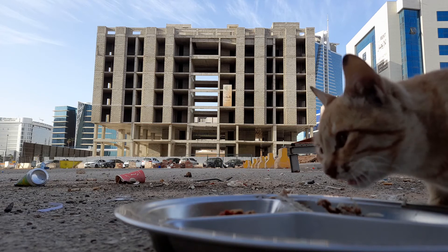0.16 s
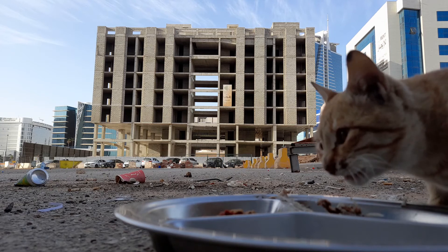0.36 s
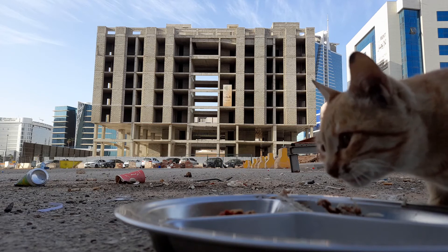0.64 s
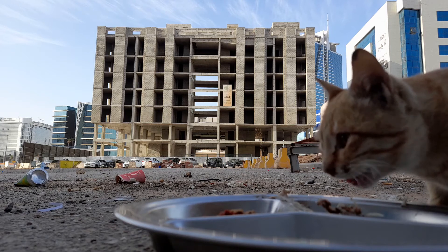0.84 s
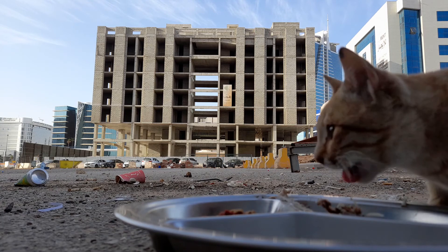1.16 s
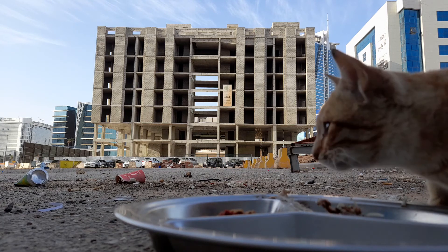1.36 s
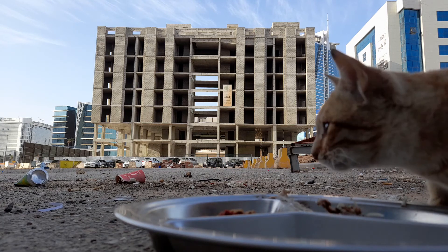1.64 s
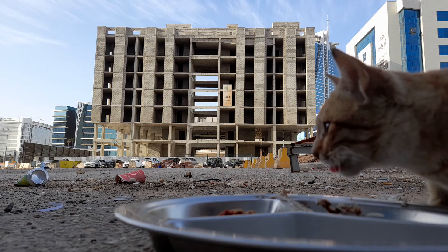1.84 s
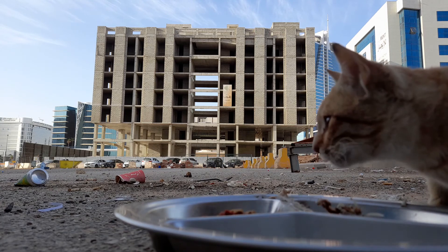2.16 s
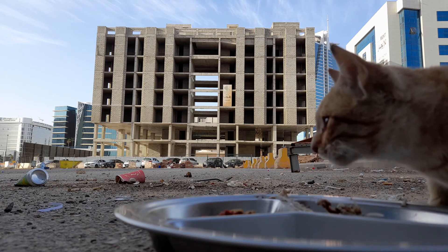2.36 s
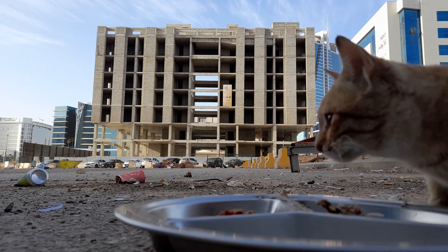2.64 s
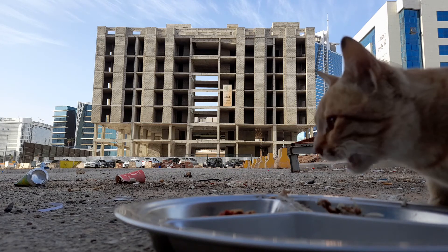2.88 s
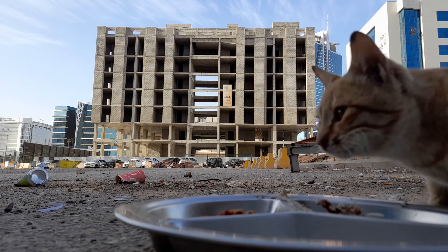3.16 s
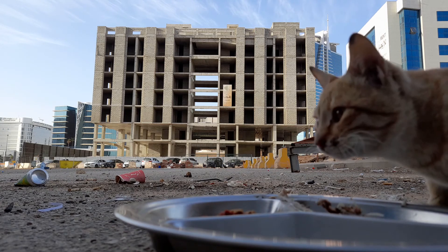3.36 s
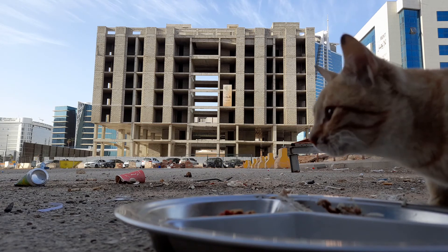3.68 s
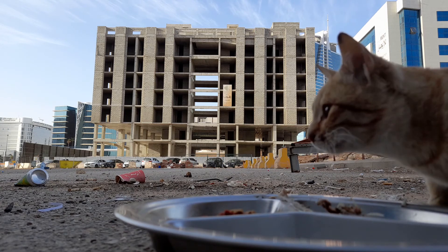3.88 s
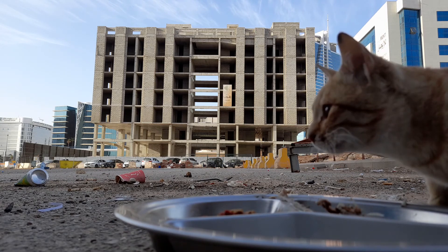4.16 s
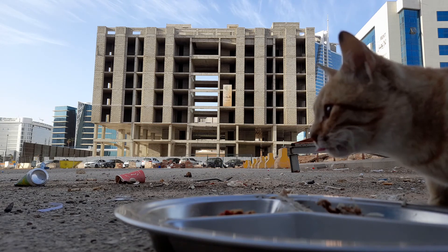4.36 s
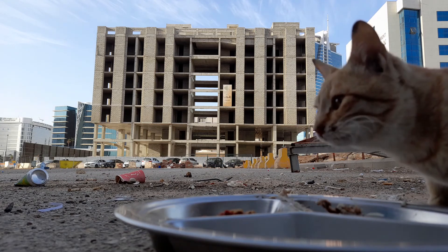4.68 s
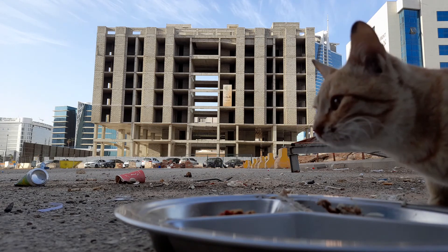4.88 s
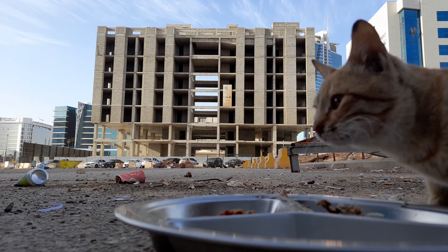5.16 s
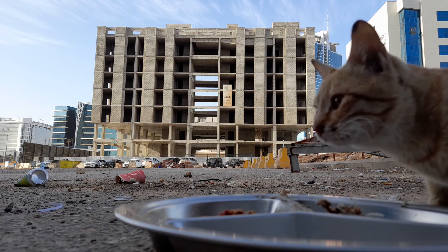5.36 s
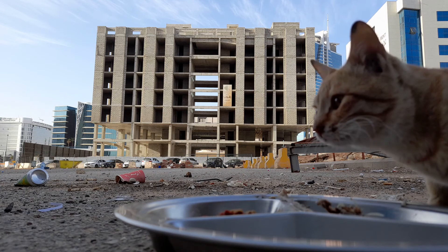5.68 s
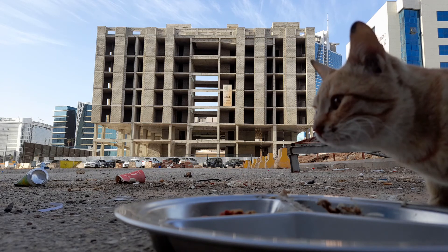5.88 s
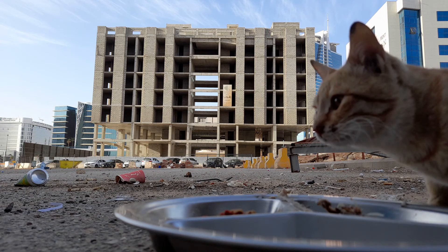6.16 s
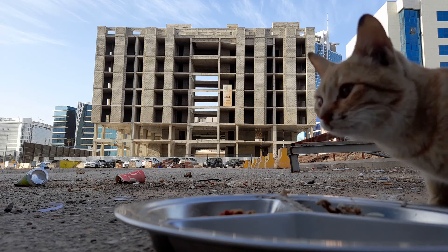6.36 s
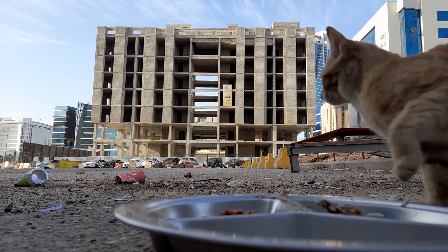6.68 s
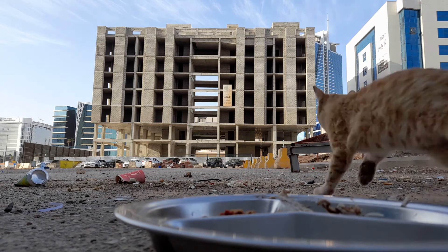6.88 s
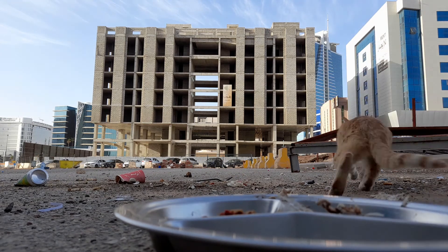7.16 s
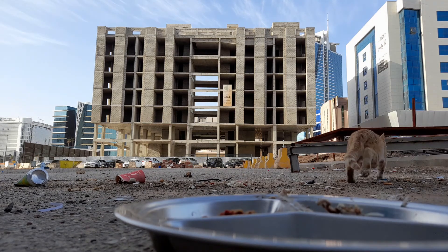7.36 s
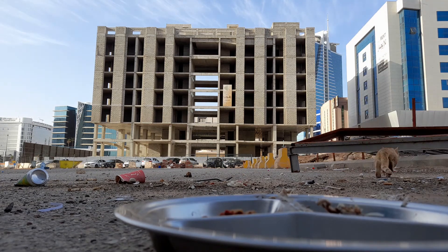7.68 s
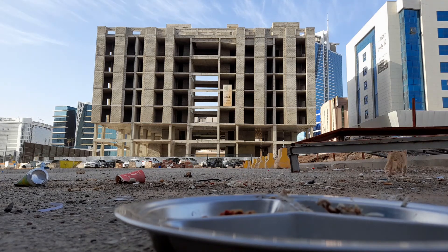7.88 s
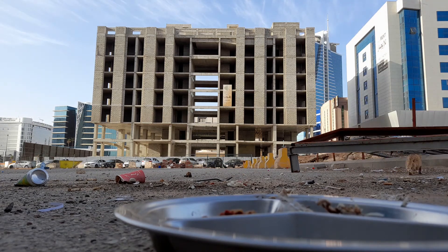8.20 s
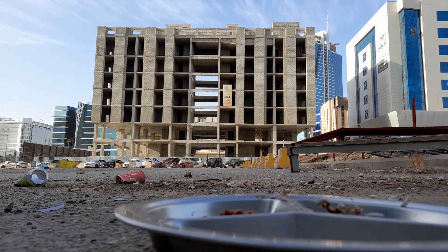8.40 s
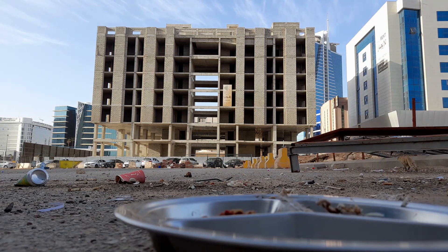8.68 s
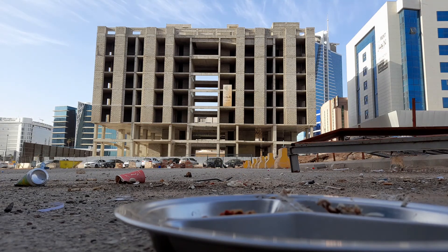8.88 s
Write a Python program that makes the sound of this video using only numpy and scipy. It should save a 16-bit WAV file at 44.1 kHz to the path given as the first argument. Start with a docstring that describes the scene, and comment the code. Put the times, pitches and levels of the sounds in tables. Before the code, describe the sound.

An open gravel lot in a city, heard in stereo close to the ground. Throughout the nine seconds, far traffic dominates: deep rumble around 100 Hz, a hollow boom near 300 Hz and a dull tyre roar with little treble, swelling and dipping slightly. A smeared low vehicle drone and its fainter higher partner climb gradually. A very thin whine above 4 kHz and soft microphone hiss lie underneath. Tiny crisp cat licks click nearby at 0.05-0.25 s, sparsely around 1.8-2.5 s, in a cluster near 2.9 s, and once at 4.6 s. From about 6 s small stones tick as the cat shifts; around 7-7.8 s quick gritty paw steps, leaning right, trot away and fade. Meanwhile a breeze bumps the left side at 6-7.5 s and 8.5 s, with left bass cutting in and out, strongest near 8 s. A faint husky chirp falls at 7.45 s.

```python
"""Distant city traffic across an open gravel lot, heard by two microphone ports near the ground.
From the start, shaped noise makes the rumble, boom and roar; sines make two rising drones and a thin whine.
Struck resonators make a cat's licks close by; later clusters of them, with sliding grit, make its paws as it trots off.
Late on a breeze reaches the ports: noise of its own makes the bass unlike in the two channels, the bass drops out
on the left, low lumps buffet that port, and a husky chirp, a smeared sine, falls once."""
import sys
import numpy as np
from scipy import signal
from scipy.fft import rfft, irfft, next_fast_len
from scipy.io import wavfile
from scipy.ndimage import uniform_filter1d

SR = 44100
rng = np.random.default_rng(int(sys.argv[2]) if len(sys.argv) > 2 else 0)


def file_out(sig):
    """Save sig as 16-bit WAV at sys.argv[1]."""
    # one column per channel
    cols = np.atleast_2d(sig).T
    # limit, then scale
    lim = np.clip(cols, -1, 1)
    pcm = np.round(lim * 32767).astype(np.int16)
    wavfile.write(sys.argv[1], SR, pcm)


N = 398528
PADDED = next_fast_len(N)   # transform length, samples


def from_db(db):
    """Logarithmic level: decibels to amplitude gain."""
    return np.exp(np.asarray(db) * (np.log(10) / 20))


def rms_one(x):
    """Power normalisation: scale to a root mean square of 1."""
    return x / np.sqrt(np.mean(x ** 2) + 1e-20)


def in_time(rows):
    """Linear interpolation: table columns as curves, one value a sample."""
    s, *columns = np.transpose(rows)
    return [np.interp(np.arange(N) / SR, s, column) for column in columns]


def at_hz(points, hz):
    """Interpolation on a log-frequency axis, as hearing spaces pitch."""
    table_hz, values = np.array(points).T
    return np.interp(np.log(hz), np.log(table_hz), values)


def drift(rate_hz):
    """Low-pass random process: sparse noise through two equal one-pole filters, scaled to spread 1."""
    step, settle = 40, 2000   # samples per sparse value; sparse values dropped while the filter settles
    pole = np.exp(-2 * np.pi * rate_hz * step / SR)
    sparse = rng.standard_normal(N // step + settle + 2)
    slow = signal.lfilter([1], [1, -2 * pole, pole * pole], sparse)[settle:]
    return np.interp(np.arange(N) / step, np.arange(len(slow)), rms_one(slow))


def panned(pan_db):
    """Intensity stereophony: left and right gains from a level difference, positive to the left."""
    return from_db([[pan_db / 2], [-pan_db / 2]])


def coloured(spectrum, white):
    """Spectral shaping: frequencies in Hz, and spectra of noise rows weighted by a table."""
    hz = np.maximum(np.fft.rfftfreq(PADDED, 1 / SR), 1)
    return hz, rfft(white, PADDED) * from_db(at_hz(spectrum, hz))


# bass dropouts on the left: start_s, length_s, depth_db
BASS_DROPOUTS = [(5.66, 0.03, -18), (6.198, 0.038, -17), (6.308, 0.03, -30), (6.715, 0.065, -26),
                 (6.79, 0.13, -17), (7.185, 0.048, -32), (7.283, 0.073, -26), (7.374, 0.051, -28),
                 (7.433, 0.047, -18), (7.544, 0.069, -33), (7.619, 0.1, -23), (7.75, 0.077, -23),
                 (7.84, 0.42, -29), (8.28, 0.089, -32), (8.428, .025, -5), (8.484, 0.045, -18),
                 (8.71, 0.037, -12), (8.751, 0.031, -25), (8.906, 0.057, -22), (8.977, 0.062, -20)]


def left_bass_db():
    """Amplitude gating: the dropouts as a level curve with edges of about 11 ms."""
    depth_db = np.full(N, -.7)
    for start_s, length_s, drop_db in BASS_DROPOUTS:
        depth_db[round(start_s * SR):round((start_s + length_s) * SR)] = drop_db
    return uniform_filter1d(depth_db, size=500)


# how alike the far field is at both ports: pitch_hz, likeness (0-1, share of power in common)
PORT_LIKENESS = [(30, 0.9), (60, 0.79), (100, 1), (200, 0.94), (340, 0.99), (400, 0.37), (1050, 0.46),
                 (1650, 0.53), (2000, 0.84), (2650, 0.22), (3000, 0.13), (5000, 0.2), (9000, .1)]
# how late the far field is on the right: pitch_hz, lag_ms
RIGHT_LAG = [(1200, 0.45), (1650, 0.42), (1950, 0.42), (2700, .365), (3100, .47), (5400, .28)]
# growth of the breeze: time_s, strength (0-1)
BREEZE_STRENGTH = [(0, 0.027), (5.3, 0.053), (6.0, 0.28), (7.8, 1), (9.04, 0.46)]
# how much of the breeze each band feels: pitch_hz, share (0-1)
BREEZE_BANDS = [(40, 1.0), (75, 0.84), (120, 0.49), (250, 0.31), (400, 0.032)]
# how much of the dropout depth in dB each band takes: pitch_hz, share (0-1)
DROPOUT_BANDS = [(25, .6), (60, 1.0), (150, 1.0), (195, .45), (240, .12), (380, .01)]


def far_noise(spectrum, patchy_db, rate_hz, count, centre_hz=None):
    """Partial coherence: stereo noise shares a part that is late on the right; its bands flicker partly together."""
    hz, (shared, own_left, own_right, gust) = coloured(spectrum, rng.standard_normal((4, N)))
    alike = np.clip(at_hz(PORT_LIKENESS, hz), 0, 1)
    delay = np.exp(-2j * np.pi * hz * at_hz(RIGHT_LAG, hz) / 1000)
    left = np.sqrt(alike) * shared + np.sqrt(1 - alike) * own_left
    right = np.sqrt(alike) * shared * delay + np.sqrt(1 - alike) * own_right
    centres = np.geomspace(spectrum[0][0], spectrum[-1][0], count)
    place = np.interp(np.log(hz), np.log(centres), np.arange(count))
    breeze, = in_time(BREEZE_STRENGTH)
    drop_db = left_bass_db()
    together = drift(rate_hz / 2)
    out = 0
    for k, centre in enumerate(centres):
        overlap = np.maximum(1 - abs(place - k), 0)   # triangular bands that sum to one
        band = irfft(overlap * np.array([left, right, gust]), PADDED)[:, :N]
        # the breeze replaces part of the left bass by noise of its own
        unlike = np.clip(at_hz(BREEZE_BANDS, centre) * breeze, 0, 1)
        band[0] = np.sqrt(1 - unlike) * band[0] + np.sqrt(unlike) * band[2]
        band[0] *= from_db(np.clip(at_hz(DROPOUT_BANDS, centre), 0, 1) * drop_db)
        if centre_hz is not None:   # whichever engines are loudest tilt the rumble up or down
            pivot_hz = 94.3
            tilt_db = 20 * np.log2(centre_hz / pivot_hz)   # dB per octave, held beyond one octave
            band *= from_db(tilt_db * np.clip(np.log2(centre / pivot_hz), -1, 1))
        out = out + band[:2] * from_db(patchy_db * (0.089 * together + drift(rate_hz)))
    return out / np.sqrt(np.mean(out[1] ** 2))   # unit power on the right


# rumble spectrum: pitch_hz, density_db (relative, per Hz)
RUMBLE_SPECTRUM = [(13, -49.5), (22, -27), (32, -17), (42, -6), (71, 3.5), (108, 3), (160, -2.5), (194, -9),
                   (220, -13.5), (290, -50), (480, -120)]
# wandering centre of the rumble: time_s, centre_hz
RUMBLE_CENTRES = [(0, 92), (1.2, 101.7), (2.4, 101.6), (3.2, 98.6), (5, 98.4), (6.5, 90), (7.6, 89),
                  (9.04, 93)]


def engine_rumble():
    """Superposition of many engines: low noise whose spectral tilt wanders, at unit power."""
    centre_hz = in_time(RUMBLE_CENTRES)[0] + 0.73 * drift(3.5)
    return far_noise(RUMBLE_SPECTRUM, patchy_db=1.0, rate_hz=13, count=9, centre_hz=centre_hz)


# boom spectrum: pitch_hz, density_db (relative, per Hz)
BOOM_SPECTRUM = [(100, -39), (170, -7.5), (194, -6), (275, 0), (339, -2.5), (378, -11.5), (400, -35),
                 (520, -20.5), (880, -120)]


def exhaust_boom():
    """Superposition of many exhausts: noise in a band about 300 Hz, at unit power."""
    return far_noise(BOOM_SPECTRUM, patchy_db=2.0, rate_hz=9.3, count=6)


# roar spectrum: pitch_hz, density_db (relative, per Hz)
ROAR_SPECTRUM = [(210, -44.5), (350, -2.5), (402, -3), (564, -7.5), (800, -7.5), (1240, -11), (1540, -17.5),
                 (1850, -20.5), (2050, -22.5), (2200, -26), (2500, -29.5), (2900, -32), (3430, -40.5),
                 (4400, -43.5), (5310, -53), (7000, -57), (9100, -79), (15400, -120)]


def tyre_roar():
    """Broadband rolling noise: tyres on far roads, with a falling treble, at unit power."""
    return far_noise(ROAR_SPECTRUM, patchy_db=1.87, rate_hz=43, count=15)


# brief dips of the whole traffic, one a slight swell: centre_s, half_width_s, depth_db (in the rumble)
TRAFFIC_DIPS = [(.13, 0.027, -2), (1.173, 0.1, -6), (2.28, 0.043, 1), (2.85, 0.055, -3),
                (3.216, 0.018, -12), (3.998, 0.019, -4.5), (4.457, 0.062, -4.5), (4.783, 0.03, -7),
                (5.962, 0.03, -4), (6.44, 0.023, -4.5), (7.215, 0.019, -15), (7.463, 0.03, -10),
                (7.64, .04, -1), (8.212, 0.046, -11.5), (8.332, 0.045, -15), (8.81, 0.05, -8.5)]


def dips_db():
    """Amplitude modulation: each dip is a Gaussian notch in the level."""
    out = np.zeros(N)
    for centre_s, half_s, depth_db in TRAFFIC_DIPS:
        first = max(round((centre_s - 3 * half_s) * SR), 0)
        near = np.arange(first, round((centre_s + 3 * half_s) * SR))
        out[near] += depth_db * np.exp(-((near / SR - centre_s) / half_s) ** 2)
    return out


# traffic before dips and surges: time_s, engine_rumble_db, exhaust_boom_db, tyre_roar_db
TRAFFIC_LEVELS = [(0, -34, -42, -39.5), (.45, -33, -38, -39.5), (.8, -36.5, -39.5, -40.5),
                  (1.4, -32.5, -38.5, -40.5), (1.7, -34.5, -39.5, -40.5), (2.15, -33, -39.5, -40.5),
                  (2.75, -35, -40.5, -40.5), (2.97, -34, -40.5, -41), (3.3, -37, -42.5, -41),
                  (3.75, -33, -42.5, -40.5), (4.3, -39, -38.5, -41.5), (4.65, -33.5, -39, -40.5),
                  (5.4, -35, -38, -41), (6.55, -34, -37, -40.5), (6.87, -33, -41, -41),
                  (7.1, -31, -36, -39.5), (7.3, -33.5, -36.5, -40.5), (7.52, -32.5, -38, -40),
                  (7.66, -31.5, -42.5, -41), (7.75, -35.5, -33, -40), (7.95, -36.5, -48, -42),
                  (8.2, -29.5, -37, -40.5), (8.45, -36, -36, -40), (8.6, -31, -41.5, -39.5),
                  (8.72, -33, -32.5, -39), (8.82, -31.5, -40, -39), (9.04, -34.5, -41.5, -41.5)]


def traffic():
    """Incoherent summation: rumble, boom and roar of many far vehicles add in power."""
    rumble_db, boom_db, roar_db = in_time(TRAFFIC_LEVELS)
    dip_db = dips_db()
    surge_db = 1.4 * drift(9.8)   # rumble and boom swell together in short lumps
    rumble = from_db(rumble_db + dip_db + surge_db) * engine_rumble()
    boom = from_db(boom_db + 0.77 * dip_db + surge_db) * exhaust_boom()
    roar = from_db(roar_db + 0.24 * dip_db) * tyre_roar()
    return rumble + boom + roar


def tone(hz, level_db, waver_hz, steady, pan_db):
    """Narrow-band modulation: a wandering part of a sine's height and phase smears its line."""
    wander = steady + (1 - steady) * (drift(waver_hz) + 1j * drift(waver_hz))
    turning = np.exp(2j * np.pi * np.cumsum(hz) / SR)
    return np.sqrt(2) * from_db(level_db) * np.real(wander * turning) * panned(pan_db)


# pitch of the low drone: time_s, pitch_hz
LOW_DRONE_PITCH = [(0, 68.5), (1.5, 70), (5, 85.5), (9.04, 98)]
# low drone before its wander: time_s, level_db
LOW_DRONE_LEVEL = [(0, -60), (.5, -42), (1.2, -67), (2, -44), (2.6, -58.5), (3, -32.5), (3.3, -66),
                   (4.1, -36), (4.45, -53), (4.62, -39.5), (5.1, -32), (5.27, -40), (5.4, -32.5),
                   (5.5, -57), (5.9, -34.5), (6.05, -48), (6.35, -35), (6.43, -49), (6.52, -29),
                   (6.72, -41.5), (6.87, -56), (7.05, -35), (7.75, -51), (8.4, -48), (8.68, -36.5),
                   (9.04, -56)]
# high drone before its wander: time_s, level_db
HIGH_DRONE_LEVEL = [(0, -51), (2.5, -66), (4.1, -53), (5.2, -54.5), (5.8, -51), (6.45, -43.5),
                    (6.87, -46.5), (7.4, -46.5), (7.75, -41.5), (8.05, -49.5), (8.68, -46.5), (9.04, -67)]


def drones():
    """Periodic excitation: a vehicle gathering speed sounds two rising tones in a fixed ratio."""
    upper_ratio = 3.265   # high pitch over low pitch
    (low_hz,), (low_db,), (high_db,) = in_time(LOW_DRONE_PITCH), in_time(LOW_DRONE_LEVEL), in_time(HIGH_DRONE_LEVEL)
    low = tone(low_hz, low_db, waver_hz=5, steady=.7, pan_db=-.1)
    low[0] *= from_db(left_bass_db())
    high = tone(upper_ratio * low_hz, high_db, waver_hz=12, steady=.5, pan_db=-8)
    return low + high


# whine before fades and panning: time_s, level_db
WHINE_LEVEL = [(0.0, -86.5), (0.02, -86), (0.7, -83), (0.88, -77), (0.95, -85), (1.08, -81), (1.74, -92),
               (1.86, -83), (2.52, -86), (2.57, -93), (2.67, -81), (3.45, -85), (3.5, -81), (3.57, -82),
               (3.67, -76.5), (4.0, -90), (4.33, -83), (4.5, -93), (5.16, -88), (5.23, -92), (5.36, -84),
               (5.86, -89), (6.19, -87), (6.22, -91), (7.02, -79.5), (7.07, -88), (7.15, -78), (7.83, -82),
               (7.85, -77), (8.1, -90), (8.38, -76), (8.48, -84), (8.61, -77), (8.83, -87), (8.99, -80),
               (9.04, -88)]


def thin_whine():
    """Phase and amplitude modulation: a sine creeps up once, fading and shifting unlike at the two ports."""
    hz, = in_time([(4.4, 4273), (5.6, 4283.5)])   # time_s, pitch_hz
    jitter_hz = 3.0 * drift(25)
    port_phase = 0.5 * drift(1.5) * [[0], [1]]   # radians, on the right only
    phase = 2 * np.pi * np.cumsum(hz + jitter_hz) / SR + port_phase
    fades_db = 0.8 * np.array([drift(4), drift(4)]) + 1.7 * drift(23)   # own to each port, then common
    level_db = in_time(WHINE_LEVEL)[0] + fades_db
    return np.sqrt(2) * from_db(level_db) * np.sin(phase) * panned(-6)


# two thin companions before fades and panning: pitch_hz, level_db
COMPANION_WHINES = [(4955, -105), (5055, -105)]


def faint_whines():
    """Pure tones: two fixed sines with slowly fluctuating amplitude."""
    out = np.zeros(N)
    for hz, level_db in COMPANION_WHINES:
        sine = np.sin(2 * np.pi * hz * np.arange(N) / SR)
        out += np.sqrt(2) * from_db(level_db + 2.4 * drift(3)) * sine
    return out * panned(-6)


# microphone self-noise spectrum: pitch_hz, density_db (relative, per Hz)
HISS_SPECTRUM = [(2940, -20), (5000, -0.5), (5990, -7), (7620, -8), (10500, -4), (13600, 0.5),
                 (15500, -0.5)]


def microphone_hiss():
    """Self-noise: each microphone adds independent shaped noise, its level drifting slightly."""
    hiss = rms_one(irfft(coloured(HISS_SPECTRUM, rng.standard_normal((2, N)))[1], PADDED)[:, :N])
    return hiss * from_db(-72 + .5 * drift(6)) * panned(-.8)


def ring(clicks, hz, t60_s):
    """Damped resonance: a unit click sets a sine of height about 1 ringing, 60 dB down after t60_s."""
    r, w = from_db(-60 / (t60_s * SR)), 2 * np.pi * hz / SR
    return signal.lfilter([0, np.sin(w)], [1, -2 * r * np.cos(w), r * r], clicks)


def bright(x):
    """Band limiting: the broad top of a crackle, with the dip that the ports have near 8 kHz."""
    top = signal.sosfilt(signal.butter(2, [4500, 15500], "band", fs=SR, output="sos"), x)
    return signal.sosfilt(signal.butter(1, [7400, 9000], "bandstop", fs=SR, output="sos"), top)


def add(out, start_s, sound, pan_db):
    """Linear superposition: place a short sound between the channels."""
    i = round(start_s * SR)
    out[:, i:i + len(sound)] += sound[:N - i] * panned(pan_db)


def snaps(rows):
    """Impulsive excitation: a brief noise burst rings a resonator, with an airy burst beside it."""
    out, t = np.zeros((2, N)), np.arange(SR // 10) / SR
    for start_s, peak_db, hz, pan_db, air_db in rows:
        ringing_burst, airy_burst = rng.standard_normal((2, len(t))) * t * np.exp(-t / [[.0009], [.0016]])
        ringing = ring(ring(ringing_burst, hz, 0.0026), hz, 0.0018)
        air = bright(airy_burst)
        snap = ringing / abs(ringing).max() + from_db(air_db) * air / abs(air).max()
        add(out, start_s, from_db(peak_db) * snap, pan_db)
    return out


# lip and tongue clicks: start_s, peak_db (ringing part), pitch_hz, left_right_db, air_db (re ringing part)
LIP_CLICKS = [(0.0508, -58, 9800, -1.5, -6), (0.1545, -65, 10300, -5, -10), (0.156, -63, 6500, -11, -10),
              (0.1634, -67, 6370, -1.5, -8), (0.1764, -67, 9400, -1.5, -6), (0.1825, -57, 9700, -1.5, -6),
              (0.183, -66, 6900, -1.5, -10), (0.2454, -69, 7200, -3, -2), (1.8354, -67, 6700, -5, -8),
              (1.9624, -70, 6300, -2.5, -10), (2.2544, -67, 6410, -2.5, -4), (2.2624, -73, 6200, -4, -6),
              (2.2727, -62, 14900, -3, -5), (2.2924, -68, 6650, -1.5, -1.5), (2.4548, -70, 6060, -3, -1.5),
              (2.7704, -70, 6240, -2.5, -4), (2.8424, -70, 6250, -2.5, -4), (2.8853, -59, 6700, -15, -4),
              (2.8914, -64, 6740, 0.1, -3), (2.8944, -61, 6700, -6, -3), (2.9004, -59, 7100, -11, -5),
              (2.899, -64, 10800, -3, -8), (2.8964, -62, 5000, -3, -8), (2.9084, -70, 6500, -1.5, -1),
              (4.6034, -70, 6870, -6, -4)]


def cat_licks():
    """Cavity resonance: lip and tongue clicks ring the cat's mouth."""
    return snaps(LIP_CLICKS)


# paws on gravel: start_s, level_db (rms, ringing part), pitch_hz, left_right_db, grit_db (pushed aside)
PAW_STEPS = [(2.608, -86, 6700, -1.5, -74), (5.965, -86, 7120, 5, -76), (5.996, -84, 5770, 4, -73),
             (6.14, -88, 6200, -.6, -69), (6.305, -88, 5730, 1.5, -84), (6.585, -87, 5780, -.6, -70),
             (6.73, -89, 5860, -1.5, -73), (6.988, -79.5, 6540, -14, -68), (7.063, -84, 6900, -8, -74),
             (7.119, -84, 6500, -7, -67), (7.174, -86, 6800, -5, -68), (7.283, -84, 6750, -5, -70),
             (7.35, -87, 6500, -2.5, -68), (7.45, -94, 5000, -2.5, -68), (7.62, -93, 5000, 0, -71),
             (7.84, -94, 5000, -2.5, -76)]
# grit spectrum: pitch_hz, density_db (relative, per Hz)
GRIT_SPECTRUM = [(2800, -20), (3600, 4), (4800, -1), (6500, -14), (8000, -16), (12000, -17), (15500, -17)]


def cat_steps():
    """Granular impact: a paw sets a short cluster of stones ringing, then grit slides on and decays."""
    length_s, air_db = 0.035, -3
    attack_s, t60_s = .015, .6   # of the sliding grit
    out, sliding = np.zeros((2, N)), np.zeros(N)
    t, since = np.arange(SR // 10) / SR, np.arange(SR) / SR
    for start_s, level_db, hz, pan_db, grit_db in PAW_STEPS:
        struck = rng.random(len(t)) < 2200 / SR   # 2200 stones a second on average
        stones = struck * rng.standard_normal(len(t)) + .14 * rng.standard_normal(len(t))
        stones *= np.minimum(t / 0.0043, 1) * np.exp(-(t / length_s) ** 2)
        ringing = rms_one(ring(ring(stones, hz, 0.0018), hz, 0.0018))
        crunch = ringing + from_db(air_db) * rms_one(bright(stones))
        add(out, start_s, from_db(level_db) * crunch, pan_db)
        slide = np.minimum(since / attack_s, 1) * from_db(grit_db - 60 * since / t60_s)
        i = round(start_s * SR)
        sliding[i:i + SR] = np.maximum(sliding[i:i + SR], slide)   # the louder slide wins
    grains = rng.standard_normal((2, N)) * from_db(1.6 * drift(60))
    scuff = rms_one(irfft(coloured(GRIT_SPECTRUM, grains)[1], PADDED)[:, :N])
    return out + sliding * scuff * panned(-3)


# single stones under a paw: start_s, peak_db (ringing part), pitch_hz, left_right_db, air_db (re ringing part)
LONE_STONES = [(6.004, -64, 5750, 2, -12), (6.1657, -60, 5700, 0.1, -16), (6.9899, -68, 6600, -9, -2)]


def lone_stones():
    """Modal impact: single stones click under a paw and ring briefly."""
    return snaps(LONE_STONES)


# gust lumps on the left port: centre_s, peak_db
GUST_LUMPS = [(6.035, -21), (6.389, -21.5), (6.50, -21), (6.902, -26.5), (7.189, -25), (7.539, -27),
              (8.528, -28.5)]


def buffets():
    """Wind buffeting: each lump is a few hundredths of a second of low noise in one channel."""
    out, t = np.zeros((2, N)), np.arange(-SR // 20, SR // 20) / SR
    low = signal.butter(2, [55, 170], "band", fs=SR, output="sos")
    for centre_s, peak_db in GUST_LUMPS:
        lump = signal.sosfilt(low, rng.standard_normal(len(t))) * np.exp(-(t / 0.02) ** 2)
        i = round(centre_s * SR) - SR // 20
        out[0, i:i + len(t)] += from_db(peak_db) * lump / abs(lump).max()
    return out


# a faint falling chirp, level before its wander: time_s, pitch_hz, level_db
HUSKY_CHIRP = [(7.44, 4700, -84), (7.455, 4550, -77), (7.47, 4200, -77), (7.487, 3670, -73),
               (7.505, 3400, -86)]


def husky_chirp():
    """Frequency glide: a falling sine, mostly smeared by fast wander, makes one husky chirp."""
    first_s, last_s = HUSKY_CHIRP[0][0], HUSKY_CHIRP[-1][0]
    gate, = in_time([(first_s - .005, 0), (first_s, 1), (last_s, 1), (last_s + .01, 0)])
    return gate * tone(*in_time(HUSKY_CHIRP), waver_hz=160, steady=0.15, pan_db=-2.5)


def scene():
    """Linear superposition of all sources at the two ports."""
    far = traffic() + drones() + thin_whine() + faint_whines()
    cat = cat_licks() + cat_steps() + lone_stones()
    return far + cat + buffets() + husky_chirp()


def record(dry):
    """Additive self-noise and band limiting: the microphones hiss and a steep low-pass cuts the top."""
    low_pass = signal.ellip(16, .3, 70, 15720, fs=SR, output="sos")   # order, ripple dB, stop dB, cutoff Hz
    return signal.sosfilt(low_pass, dry + microphone_hiss())


dry = scene()
out = record(dry)
file_out(out)
```